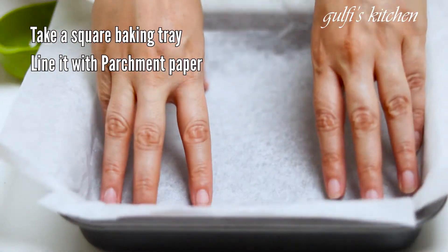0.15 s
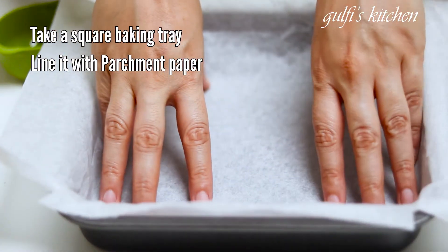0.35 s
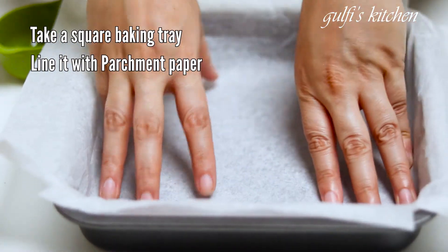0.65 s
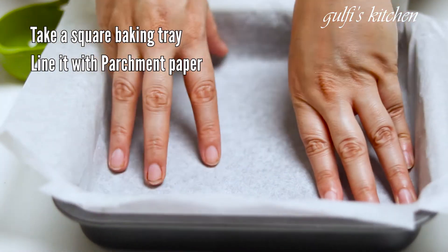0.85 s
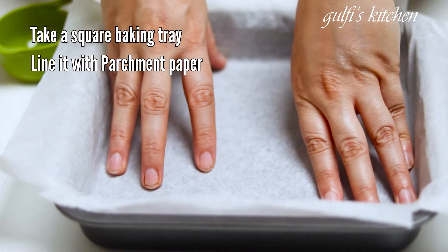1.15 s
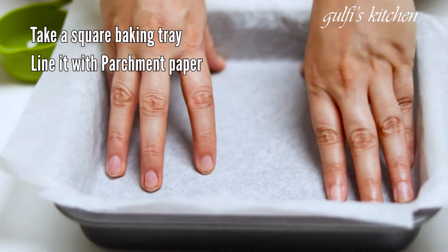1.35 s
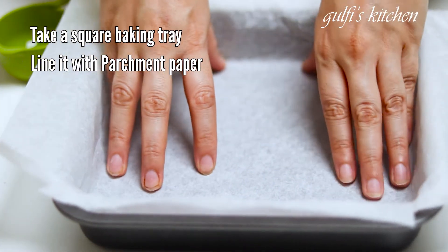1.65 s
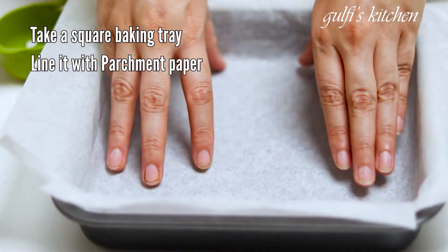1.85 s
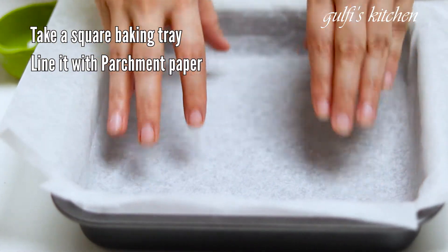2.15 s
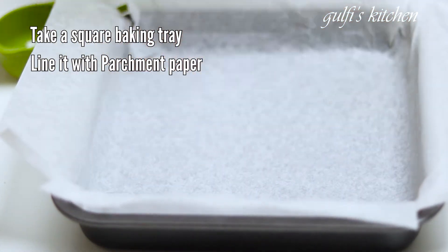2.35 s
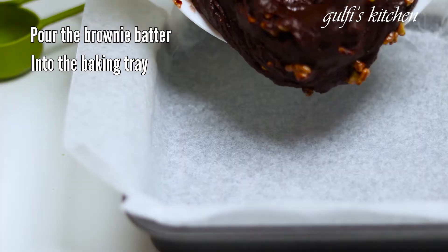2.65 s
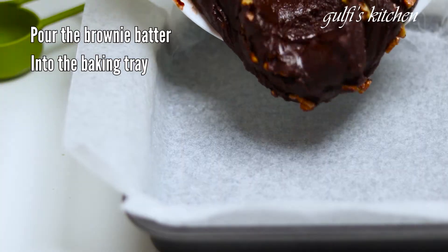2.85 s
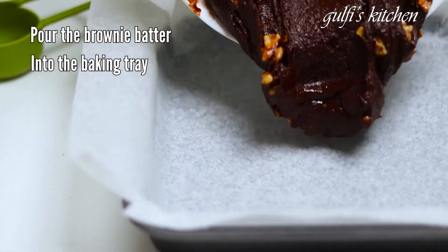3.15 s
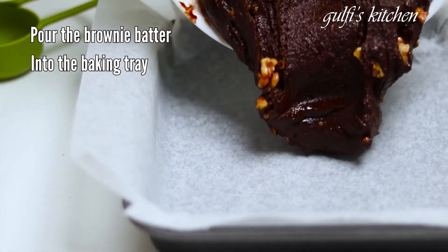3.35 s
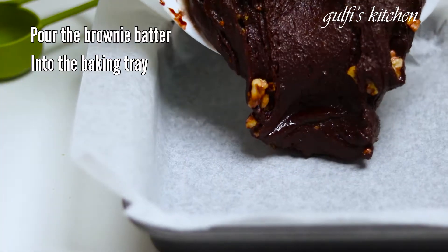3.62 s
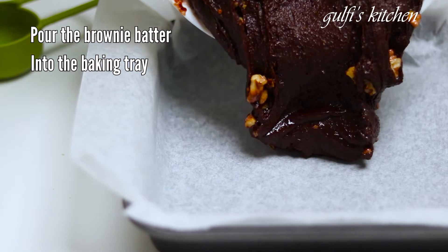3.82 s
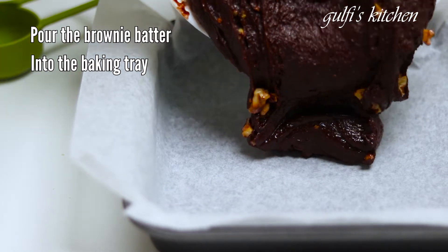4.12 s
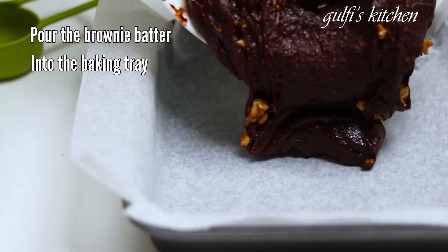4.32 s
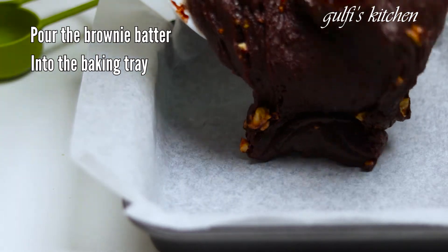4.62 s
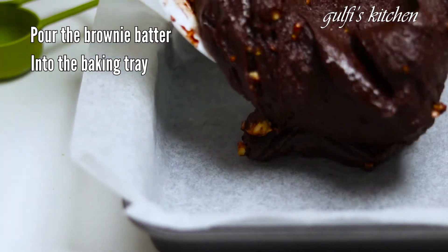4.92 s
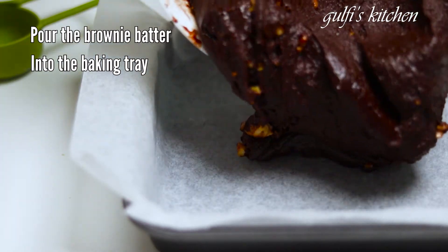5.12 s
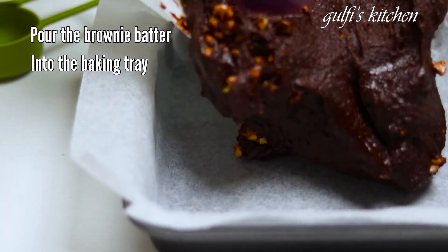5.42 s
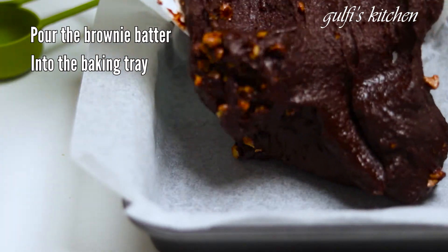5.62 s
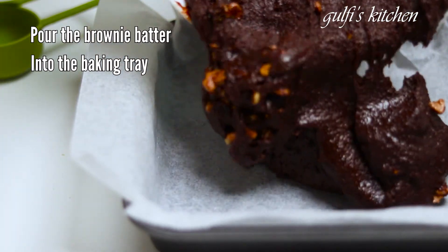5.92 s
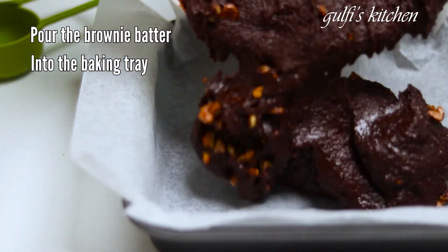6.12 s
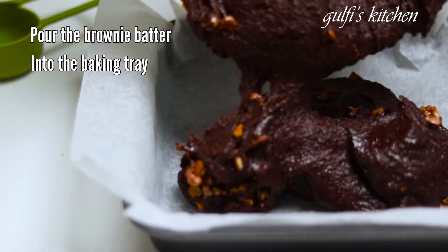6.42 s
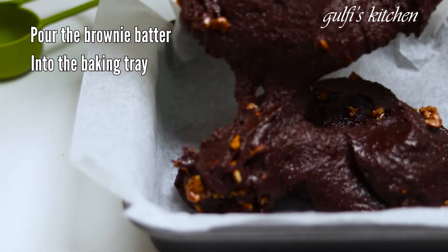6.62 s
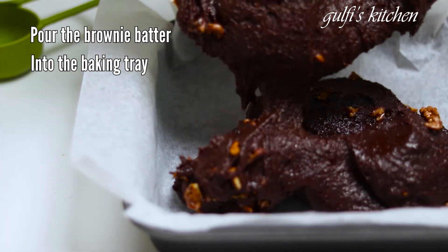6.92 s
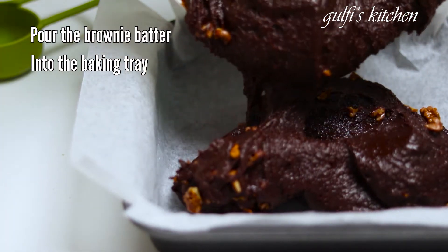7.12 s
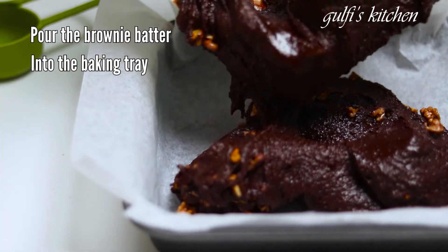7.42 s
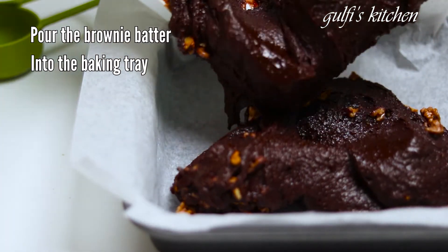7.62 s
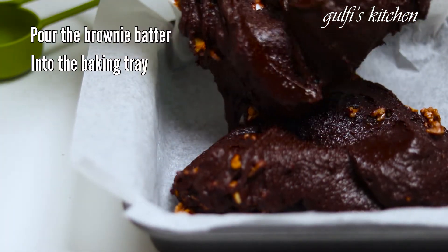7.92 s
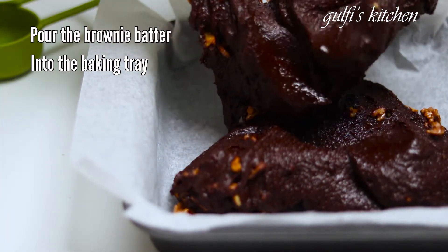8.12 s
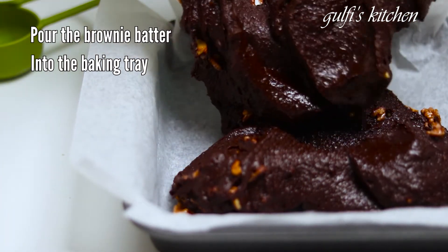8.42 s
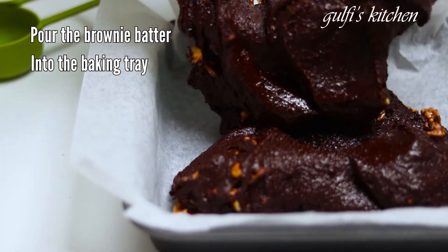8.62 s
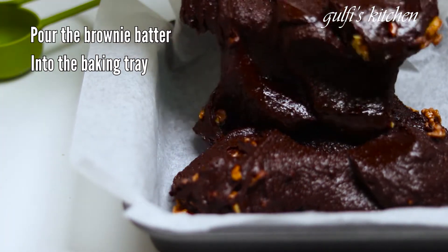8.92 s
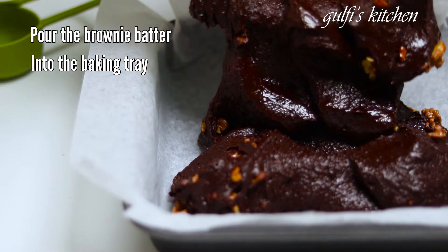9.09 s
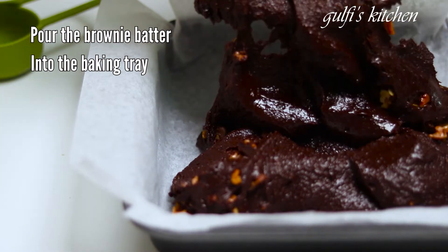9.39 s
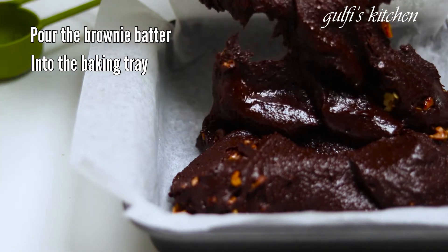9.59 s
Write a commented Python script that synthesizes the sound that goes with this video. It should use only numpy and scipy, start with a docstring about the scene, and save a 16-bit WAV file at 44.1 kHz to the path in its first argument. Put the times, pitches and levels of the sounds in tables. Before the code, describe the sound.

Parchment paper rustles and snaps loudly as hands press it into a metal pan, then thick batter settles with faint crackles while a bird chirps outside.

```python
"""Parchment rustles and snaps as hands press it into a metal pan, which is knocked a few times; then thick
batter slumps onto it with small crackles and sticky ticks. A songbird sings outside the echoing kitchen,
over low hum and a slow subsonic throb. Paper and batter are showers of tiny slips ringing facets of the sheet,
plus single snaps; the pan is a set of decaying modes, the bird gliding sines, the thuds and air shaped noise."""
import sys
import numpy as np
from scipy import signal
from scipy.fft import rfft, irfft
from scipy.io import wavfile
from scipy.ndimage import uniform_filter1d

SR = 44100
rng = np.random.default_rng(int(sys.argv[2]) if len(sys.argv) > 2 else 0)


def log_audio(samples):
    """Write samples as a 16-bit WAV file to the path given in sys.argv[1]."""
    # one column per channel
    frames = np.atleast_2d(samples).T
    # limit to full scale, then quantise
    limited = np.clip(frames, -1, 1)
    pcm = np.round(limited * 32767).astype(np.int16)
    wavfile.write(sys.argv[1], SR, pcm)


N = 429975
TIME = np.arange(N) / SR

# modes of the pan: f/Hz, relative level/dB, t60/s
PAN_MODES = [(167, -3, 0.12), (326.6, -0.5, 0.17), (428, -6, 0.17), (600, 6, 0.067), (805, 1, 0.16),
             (1042, 0, 0.17), (1470, -11, 0.12), (1650, -9, 0.039), (1770, -29, .16), (2980, 9.5, 0.17)]
# how alike left and right are for sounds in the pan: f/Hz, likeness (1 = identical)
CLOSE_LIKENESS = [(300, 0.99), (2000, 0.63), (4000, 0.72), (8000, 0.15), (16000, 0.12)]
# how alike left and right are for the room: f/Hz, likeness (1 = identical)
AIR_LIKENESS = [(30, 0.59), (250, 0.82), (700, 0.76), (2000, 0.355), (5000, 0.13), (16000, 0.163)]

# left-right balance: below 0 leans to the right
SNAP_PAN_DB, TICK_PAN_DB = -2.5, -3.5
FACET_T60_S = .03
CUTOFF_HZ = 16200


def parchment():
    """Fingers slide over the sheet; creases snap, wrinkles crackle and the pan bottom sounds under the pressure."""
    # hands press and smooth the sheet: t/s, hold/s, hiss/dB, crackle over hiss/dB, pan bottom over hiss/dB
    presses = [(0.0, .15, -40.5, -23, -10.5), (0.153, .085, -34.5, -5.5, -18.5),
               (0.267, .02, -35.5, -18.5, -22), (0.335, .175, -42, -3, -11.5),
               (0.525, .06, -36.5, -10, -10), (0.612, .028, -36, -21, -30), (0.685, .1, -51.5, -1, -35),
               (0.789, .042, -38.5, -7, -10.5), (0.862, .02, -33.5, -12.5, -12.5),
               (0.913, .185, -42.5, -2.5, -13), (1.145, .035, -41, -5, -4.5),
               (1.208, .07, -51.5, -30.5, -10), (1.388, .055, -46.5, -2, -18.5),
               (1.484, .065, -49.5, 0.5, -12), (1.592, .05, -58, 3, -23), (1.669, .032, -46, 0, -21),
               (1.772, .085, -45.5, -2, -11.5), (1.896, .045, -55.5, -8, -19.5),
               (1.986, .03, -46, -6.5, -10), (2.18, .3, -64, -5.5, -6)]
    # creases snapping: t/s, relative level/dB, centre f/Hz, ring t60/ms
    creases_at = [(0.066, -21, 2920, 3.2), (0.137, -23, 2540, 16), (0.161, -18.5, 2000, 14),
                  (0.224, -17.5, 2920, 11), (0.278, -22.5, 2540, 34), (0.355, -22, 4280, 7.5),
                  (0.413, -24.5, 2550, 25), (0.419, -22.5, 3430, 14), (0.441, -13, 5940, 9.1),
                  (0.48, -19, 2210, 17), (0.55, -27.5, 1650, 5.6), (0.58, -18.5, 2940, 18),
                  (0.635, -9.5, 3560, 14.5), (0.803, -18.5, 4000, 27), (0.819, -22.5, 3600, 7.9),
                  (0.879, -16, 3960, 19), (0.8845, -15, 4600, 19), (0.898, -22, 5000, 11),
                  (0.945, -20, 5760, 12), (1.007, -18.5, 6200, 16), (1.112, -26, 3300, 14),
                  (1.16, -14.5, 2300, 11.4), (1.355, -26.5, 4070, 9.6), (1.413, -25, 3100, 9),
                  (1.496, -25, 6700, 18), (1.599, -32.5, 3460, 16), (1.686, -19, 8150, 16),
                  (1.692, -17, 4570, 10), (1.796, -28.5, 5300, 11), (1.836, -26, 5800, 10),
                  (1.856, -26, 4860, 7.7), (1.913, -19.5, 5300, 7.7), (1.935, -28.5, 3600, 10),
                  (1.9865, -23, 6800, 30), (1.991, -16, 5430, 16), (2.177, -25.5, 1970, 9.4),
                  (2.226, -29.5, 2940, 11.5), (2.336, -41.5, 3200, 13), (2.36, -37, 3300, 11),
                  (2.39, -41, 3470, 11), (2.45, -36, 3350, 13), (2.467, -24, 2620, 9.5)]
    # spectrum of the rustle: f/Hz, density/dB per Hz
    paper_spectrum = [(500, -19.5), (900, -8.5), (1500, -6.5), (2200, -3.5), (2800, 1), (4000, -5.5),
                      (6000, -9.5), (9000, -17), (16000, -30)]
    # spectrum of the bright crackle: f/Hz, density/dB per Hz
    crackle_spectrum = [(3000, -20.5), (5500, -4), (7500, 2), (10000, -4), (13000, -15), (16000, -16)]
    # spectrum of rubbing on the pan bottom: f/Hz, density/dB per Hz
    rub_spectrum = [(70, -7.5), (150, -8), (380, -11), (500, 0.5), (700, -4.5), (1100, -1), (1800, 4.5),
                    (4000, -40)]

    hiss, crackle, press = 0, 0, 0
    for s, hold_s, db, bright_db, bottom_db in presses:
        movement = from_db(db) * swell(s, hold_s, attack_s=0.013, release_db_per_s=221)
        hiss = hiss + movement
        crackle = crackle + from_db(bright_db) * movement
        press = press + from_db(bottom_db) * movement

    slips = grains(per_s=6000, spread_db=2.5, clump_db=4.0, width=0.029, shift_db=-0.5)
    rustle = from_db(-4.5) * hiss * coloured(slips, paper_spectrum)
    rustle = rustle + from_db(-5.0) * crackle * coloured(slips, crackle_spectrum)

    friction = coloured(noise(CLOSE_LIKENESS), rub_spectrum)
    resonance = rms_one(pan_body(friction))
    bottom = from_db(-4.0) * press * (friction + from_db(-4.0) * resonance)

    folds = clustered(creases_at, weaker_db=12.5, octaves=0.22, ring_ms=2)
    creases = from_db(-8.0) * snaps(
        folds, SNAP_PAN_DB, width=0.28, broad_db=-9.5, low_hz=1280, top_hz=12200,
        scatter_db=-8, scatter_t60=0.026, modes_db=-17.5, modes_t60=FACET_T60_S)

    strays = stray_snaps(hiss + crackle, db=3.5, spread_db=10, hz=4600, octaves=2.0, ring_ms=5.6,
                         follows=.15, count=130)
    wrinkles = snaps(
        strays, SNAP_PAN_DB, width=0.25, broad_db=-25, low_hz=1300, top_hz=12000,
        scatter_db=-14, scatter_t60=0.059, modes_db=-13, modes_t60=FACET_T60_S)
    return (rustle + bottom) * panned(pan_db=-3.5) + creases + wrinkles


def pan():
    """Every knock rings all modes, each with a new strength; each mode reaches the two sides at its own phase."""
    # the pan knocked against the counter: t/s, relative level/dB
    knocks = [(0.479, -53.5), (0.635, -69), (0.886, -58), (1.160, -47), (1.989, -52), (2.178, -72.5)]
    out, t = np.zeros((2, N)), TIME[:SR // 2]
    for s, db in knocks:
        ring = 0
        for hz, level_db, t60 in PAN_MODES:
            strength = rng.choice([-1, 1]) * from_db(rng.normal(0, 2))
            phase = rng.normal(0, 0.25, (2, 1))
            fade = from_db(level_db - 60 * t / t60)
            ring = ring + strength * fade * np.sin(2 * np.pi * hz * t + phase)
        add(out, s, from_db(db - 1.0) * ring)
    return out * panned(pan_db=-1.5)


def pan_body(x):
    """The thin metal under the paper passes on what touches it, strongest at its modes."""
    out = 0
    for k, (hz, db, t60) in enumerate(PAN_MODES):
        # broad peaks: the modes ring shorter here than in a knock
        b, a = signal.iirpeak(hz, hz * t60 / 7.5, fs=SR)
        out = out + (-1) ** k * from_db(db) * signal.lfilter(b, a, x)
    return out


def batter():
    """The heavy mass creases the paper beneath it with a dry crackle, and ticks as it sticks and parts."""
    # the paper gives way under the batter: t/s, hold/s, relative level/dB
    slumps = [(3.128, .2, -51), (3.442, 0.19, -64.5), (3.834, .41, -65), (5.066, .75, -69.5),
              (6.151, .1, -61.5), (7.28, .025, -59.5), (9.303, 0.055, -57.5), (9.451, 0.041, -67),
              (9.69, .06, -62.5)]
    # batter ticking as it folds and sticks to the paper: t/s, relative level/dB, centre f/Hz
    ticks_at = [(3.1416, -35.5, 4050), (3.1628, -27, 6000), (3.212, -33, 5350), (3.265, -36, 4220),
                (3.319, -31, 8350), (3.3277, -32.5, 4900), (3.482, -36, 5760), (3.7603, -50, 4250),
                (3.8353, -44, 3940), (3.843, -39.5, 3580), (3.936, -39, 8400), (3.9433, -37, 4200),
                (3.9692, -43, 5470), (3.9735, -45, 12000), (4.0736, -39.5, 3730), (4.136, -43.5, 6020),
                (4.1487, -41, 4290), (4.1645, -38, 4060), (4.2133, -39, 5800), (4.324, -49.5, 4600),
                (4.4702, -40, 4870), (4.504, -37.5, 4400), (5.1934, -44, 5500), (5.2005, -37, 4200),
                (5.3347, -46.5, 11000), (5.3532, -47.5, 11100), (5.433, -51, 4700), (5.7732, -48, 4100),
                (5.7887, -44.5, 4430), (6.0466, -46.5, 12000), (6.166, -34, 7420), (6.2085, -40, 6200),
                (6.236, -44, 4830), (6.2427, -37.5, 5500), (6.3422, -48.5, 4300), (6.636, -52, 4240),
                (6.8607, -34.5, 4140), (7.006, -45, 7240), (7.072, -35, 5530), (7.1368, -39.5, 4170),
                (7.3672, -49, 3830), (7.7176, -42.5, 4050), (7.9592, -49, 6100), (8.436, -50, 4650),
                (8.9437, -45.5, 4600), (9.307, -38, 4900), (9.3235, -34.5, 6170), (9.3812, -46, 4600),
                (9.4818, -42, 3770), (9.5038, -43, 3820), (9.6624, -38, 4600), (9.6974, -33.5, 5080)]
    # spectrum of the creasing paper: f/Hz, density/dB per Hz
    batter_spectrum = [(200, 4), (600, -5), (1500, -5), (3200, -1.5), (6000, -11.5), (10000, -6),
                       (16000, -16)]

    load = 0
    for s, hold_s, db in slumps:
        load = load + from_db(db) * swell(s, hold_s, attack_s=0.044, release_db_per_s=169.5)
    slips = grains(per_s=9000, spread_db=3.0, clump_db=3.0, width=.5, shift_db=2.0)
    creasing = from_db(-1.6) * load * coloured(slips, batter_spectrum)

    tick_ring_ms = 10.5
    rows = clustered([(*tick, tick_ring_ms) for tick in ticks_at], weaker_db=16, octaves=0.57, ring_ms=3.1)
    rows += stray_snaps(load, db=23, spread_db=14, hz=5500, octaves=0.92, ring_ms=10,
                        follows=0.31, count=30)
    ticks = snaps(
        rows, TICK_PAN_DB, width=0.23, broad_db=-16.5, low_hz=2570, top_hz=16300,
        scatter_db=-13.5, scatter_t60=0.053, modes_db=-17, modes_t60=0.015)
    return creasing * panned(pan_db=-2.5) + ticks + stickiness(level_db=-53, spread_db=1.0)


def stickiness(level_db, spread_db, count=72):
    """Faint ticks at random while the batter creeps out of the bowl, densest in mid-pour."""
    times = rng.triangular(3.4, 5.2, 9.75, count)   # first, densest, last s
    rows = [(s, level_db + spread_db * rng.uniform(-1, 1), rng.uniform(6000, 13000), 5) for s in times]
    return snaps(
        rows, TICK_PAN_DB, width=.48, broad_db=-7, low_hz=3200, top_hz=16000,
        scatter_db=-22, scatter_t60=.06, modes_db=-28, modes_t60=.018)


def thuds():
    """Soft, low bumps that boom briefly: noise with a bass spectrum under a decaying envelope."""
    # dull thuds as the heavy batter is shifted: t/s, level/dB, decay t60/s
    bumps = [(3.755, -59, 0.81), (4.96, -55, 0.88)]
    # spectrum of a thud: f/Hz, density/dB per Hz
    thud_spectrum = [(90, -39), (150, 5), (195, 13), (260, -1), (400, -2), (1000, -72)]
    out, t = np.zeros((2, N)), TIME[:SR // 2]
    boom = coloured(noise(CLOSE_LIKENESS), thud_spectrum)
    for s, db, t60 in bumps:
        fade = from_db(-60 * t / t60) * (1 - np.exp(-t / 0.008))
        start = round(s * SR)
        bump = boom[:, start:start + len(t)] * fade
        add(out, s, from_db(db) * rms_one(bump) * np.sqrt(np.mean(fade ** 2)))
    return out


def bird():
    """Gliding whistles with a faint octave and a rough trill, that arrive mostly as reflections."""
    # bird notes: t/s, length/s, first f/Hz, last f/Hz, loudest 20 ms/dB, trill swing/Hz
    song = [(0.0, 0.017, 3780, 4160, -41.5, 170), (4.037, .047, 1700, 1770, -67, 20),
            (4.06, 0.064, 3590, 2774, -57, 310), (4.171, 0.071, 2560, 2944, -44.5, 230),
            (4.403, 0.085, 3790, 3626, -56, 72), (4.447, 0.021, 4880, 4720, -59, 54),
            (4.479, 0.034, 4350, 4600, -44, 150), (4.531, 0.066, 5165, 5350, -48, 66),
            (5.184, 0.037, 1860, 2090, -54, 30), (5.256, 0.044, 2550, 2670, -47.5, 31),
            (5.275, .09, 2694, 2186, -50, 61), (5.55, 0.065, 4680, 5020, -50.5, 1160),
            (6.836, 0.064, 3850, 4050, -52.5, 320), (6.86, 0.062, 3510, 3296, -40, 55),
            (6.897, 0.133, 3580, 3678, -43.5, 84), (7.067, 0.13, 2600, 2290, -56, 115),
            (7.143, 0.043, 2650, 3180, -42, 195), (7.471, 0.066, 4800, 5500, -53.5, 140),
            (7.494, 0.042, 5570, 6860, -48, 510)]
    glide_ease = 2.13   # a note leaves its first pitch fast and settles on its last
    trill_per_s, trill_roughness = 140, 0.606
    out, path = np.zeros((2, N)), echoes(t60=0.18, treble_t60=0.41, build_s=0.0066)
    path[:, 0] += .5   # direct sound
    for s, length, first_hz, last_hz, db, swing_hz in song:
        t = TIME[:int(length * SR)]
        glide_hz = last_hz + (first_hz - last_hz) * (1 - t / length) ** glide_ease
        wobble = drift(891, size=SR)[:len(t)]
        trill = np.sin(2 * np.pi * trill_per_s * t) + trill_roughness * wobble
        phase = 2 * np.pi * np.cumsum(glide_hz + swing_hz * trill) / SR
        whistle = np.sin(phase) + from_db(-30.0) * np.sin(2 * phase)
        note = whistle * signal.windows.tukey(len(t), .3)
        heard = signal.fftconvolve(note[None], path, axes=1)
        loudest = uniform_filter1d(np.mean(heard ** 2, axis=0), size=900).max()
        add(out, s, from_db(db) * heard / np.sqrt(loudest))
    return out


def room_tone():
    """Steady air noise, an appliance with a wavering hum and a thin whine, and the throb."""
    # spectrum of the air: f/Hz, density/dB per Hz
    air_spectrum = [(25, -3), (53, -23), (92, -3.5), (200, -8), (380, -7), (480, -9.5), (780, -10.5),
                    (950, -16.5), (2700, -18.5), (5000, -24), (6000, -27), (16000, -33)]
    # appliance hum: f/Hz, level before wavering/dB rms
    hum_tones = [(59, -78.5), (86.5, -79), (118, -80.5), (173, -79), (261, -77), (353, -78.5)]
    air = from_db(-63.5) * coloured(noise(AIR_LIKENESS), air_spectrum)
    hum = 0
    for hz, db in hum_tones:
        level = from_db(db + 4.4 * np.minimum(drift(13), 1)) * np.sqrt(2)
        hum = hum + level * np.sin(2 * np.pi * hz * TIME + 0.7 * drift(3.6))
    whine_hz, half_width_hz = 2360, 45
    whine_band = [whine_hz - half_width_hz, whine_hz + half_width_hz]
    whine = from_db(-80.0) * rms_one(filtered(noise(AIR_LIKENESS), whine_band, "band"))
    steady = (air + hum + whine) * panned(pan_db=-2.5)
    return steady + throb(width_s=0.021, level_db=-37.0, low_hz=4.4)


def throb(width_s, level_db, low_hz):
    """A soft pressure pulse about once a second; the microphone's bass roll-off makes it swing back."""
    first_s, period_s = .964, 1.1145
    from_pulse_s = (TIME - first_s + period_s / 2) % period_s - period_s / 2
    pulse = -np.exp(-(from_pulse_s / width_s) ** 2)
    return from_db(level_db) * filtered(pulse, low_hz, "high")


def grains(per_s, spread_db, clump_db, width, shift_db, count=26):
    """Tiny slips, uneven in size and coming in clumps, each ringing one of many facets of the sheet."""
    sizes = from_db(spread_db * np.minimum(rng.exponential(1, N), 3) + clump_db * drift(220))
    slips = rng.standard_normal((2, N)) * sizes * (rng.random(N) < per_s / SR)
    pitches, out = np.geomspace(600, 15000, count), 0
    # small facets outnumber large ones
    facet = rng.choice(count, N, p=np.sqrt(pitches) / np.sqrt(pitches).sum())
    for k, hz in enumerate(pitches):
        struck = slips * (facet == k) + 1e-18
        ring = rms_one(filtered(struck, [hz / (1 + width), hz * (1 + width)], "band", order=1))
        # facets come and go as the sheet bends
        presence = from_db(shift_db * np.clip(drift(35), -2, 2))
        out = out + np.sqrt(hz) * ring * presence
    return stereo(out, CLOSE_LIKENESS)


def snaps(rows, pan_db, width, broad_db, low_hz, top_hz, scatter_db, scatter_t60, modes_db, modes_t60, count=5):
    """Each snap shakes one facet for a few ms, leaves a few modes ringing and scatters between the pan walls."""
    out, t = np.zeros((2, N)), TIME[:4096]
    for s, db, hz, ring_ms in rows:
        white = noise(CLOSE_LIKENESS, size=len(t))
        facet = filtered(white, [hz / (1 + width), hz * (1 + width)], "band", order=1)
        shake = filtered(facet + from_db(broad_db) * white, low_hz, "high")
        shake = filtered(shake, top_hz, "low")
        ring = from_db(-60 * 1000 * t / max(ring_ms, 1))
        scatter = from_db(scatter_db - 60 * t / scatter_t60)
        fade = (ring + scatter) * (1 - np.exp(-t / 0.00047))
        burst = rms_one(shake * fade) * np.sqrt(np.mean(fade ** 2))

        pitches = np.minimum(hz * 2 ** rng.uniform(-0.667, 0.64, (count, 1)), CUTOFF_HZ)
        strengths = rng.normal(0.81, 0.76, (2, count)) * rng.choice([-1, 1], count)
        modes = strengths @ np.sin(2 * np.pi * pitches * t)
        ringing = modes * from_db(modes_db - 60 * t / modes_t60)
        add(out, s, from_db(db) * panned(pan_db + rng.normal(0, 1.5)) * (burst + ringing))
    return out


def clustered(rows, weaker_db, octaves, ring_ms, count=2):
    """A fold gives way in steps: a small snap announces the main one and another follows it."""
    lead_s, lag_s = .004, .013   # longest wait before and after
    delays = [-lead_s] + [lag_s] * (count - 1)
    small = []
    for s, db, hz, _ in rows:
        for delay in delays:
            at_s = s + delay * rng.uniform(.4, 1)
            small_db = db - weaker_db + rng.normal(0, 3)
            small_hz = hz * 2 ** (octaves * rng.uniform(-1, 1))
            small.append((at_s, small_db, small_hz, ring_ms))
    return list(rows) + small


def stray_snaps(gain, db, spread_db, hz, octaves, ring_ms, follows, count=60):
    """Rows of small snaps at random, more frequent and louder the harder the sheet is worked."""
    chance = np.cumsum(gain ** follows)
    draws = rng.random((count, 3))
    at = np.searchsorted(chance, chance[-1] * (np.arange(count) + draws[:, 0]) / count)
    rows = []
    for i, (_, weak, pitch) in zip(at, draws):
        level_db = 20 * np.log10(gain[i] + 1e-9) + db - spread_db * weak
        rows.append((i / SR, level_db, hz * 2 ** (octaves * (pitch - .5)), ring_ms))
    return rows


def swell(s, hold_s, attack_s, release_db_per_s):
    """Gain of one movement: it rises, holds and dies away."""
    t = TIME - s
    return np.clip(t / attack_s, 0, 1) * from_db(-release_db_per_s * np.clip(t - hold_s, 0, 1))


def echoes(t60, treble_t60, build_s):
    """Diffuse reflections that build up, bass and treble dying at their own rates; unit mean energy per ear."""
    t, diffuse = TIME[:SR], noise(AIR_LIKENESS, size=SR)
    low = filtered(diffuse, 5700, "low", order=1)
    tail = low * from_db(-60 * t / t60) + (diffuse - low) * from_db(-60 * t / treble_t60)
    return rms_one(tail * (1 - np.exp(-t / build_s))) / np.sqrt(SR)


def noise(likeness, size=N):
    """White noise at left and right."""
    return stereo(rng.standard_normal((2, size)), likeness)


def stereo(pair, likeness):
    """Two unrelated signals become left and right, as alike at each frequency as the likeness says."""
    size = pair.shape[1]
    alike = np.clip(on_bins(likeness, size), -1, 1)
    mid, side = rfft(pair)
    both = np.sqrt(1 + alike) * mid + np.sqrt(1 - alike) * side * [[1], [-1]]
    return irfft(both, size) / np.sqrt(2)


def coloured(x, spectrum):
    """Shape a signal by a spectrum; rms 1."""
    return rms_one(irfft(rfft(x) * from_db(on_bins(spectrum, N)), N))


def on_bins(points, size):
    """A curve over frequency read at the bins of a transform."""
    hz, value = np.transpose(points)
    return np.interp(np.log(np.fft.rfftfreq(size, 1 / SR) + 1), np.log(hz), value)


def filtered(x, hz, kind, order=2):
    """Causal Butterworth filter."""
    sos = signal.butter(order, np.clip(hz, 2, .47 * SR), kind, fs=SR, output="sos")
    return signal.sosfilt(sos, x)


def drift(per_s, size=N):
    """Smooth random wander around 0: normal draws, per_s of them a second, joined by lines."""
    points = rng.standard_normal(size // 20 + 2)
    return np.interp(np.arange(size) / SR * per_s, np.arange(len(points)), points)


def panned(pan_db):
    """Left and right gains, pan_db apart."""
    return from_db(np.array([[pan_db], [-pan_db]]) / 2)


def from_db(db):
    """Decibels to gain."""
    return 10 ** (np.asarray(db) / 20)


def rms_one(x):
    """Scale to rms 1."""
    return x / np.sqrt(np.mean(x ** 2) + 1e-20)


def add(out, s, sound):
    """Mix a stereo sound in at a time in seconds."""
    at = max(round(s * SR), 0)
    out[:, at:at + sound.shape[1]] += sound[:, :N - at]


def scene():
    """Sounds in the pan are close; the kitchen answers with a short, soft tail."""
    close = parchment() + pan() + batter()
    walls = from_db(-8.5) * echoes(t60=0.41, treble_t60=0.28, build_s=0.0017)
    reverb = signal.fftconvolve(close, walls, axes=1)[:, :N]
    return close + reverb + thuds() + bird() + room_tone()


def record(dry):
    """The top is cut steeply."""
    return signal.sosfilt(signal.ellip(10, .2, 80, CUTOFF_HZ, fs=SR, output="sos"), dry)


dry = scene()
out = record(dry)
log_audio(out)
```